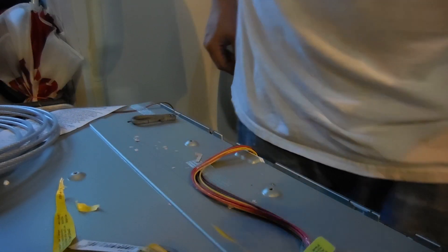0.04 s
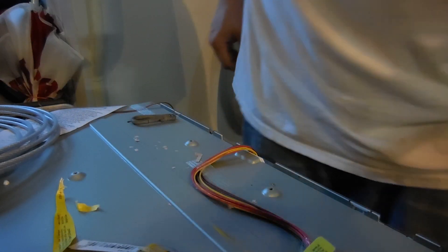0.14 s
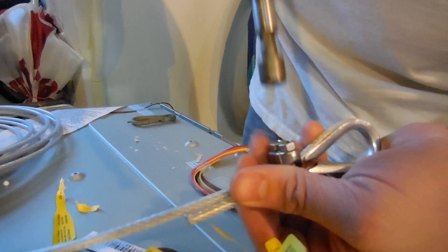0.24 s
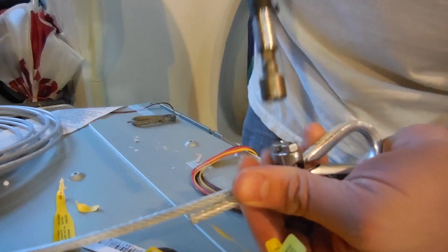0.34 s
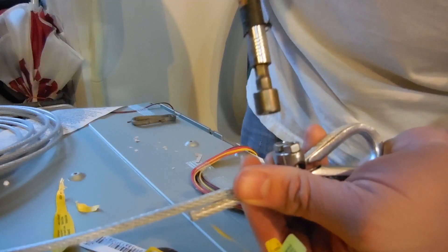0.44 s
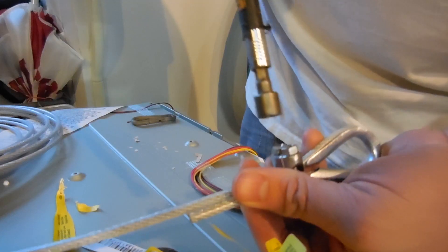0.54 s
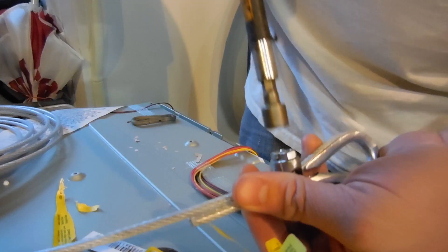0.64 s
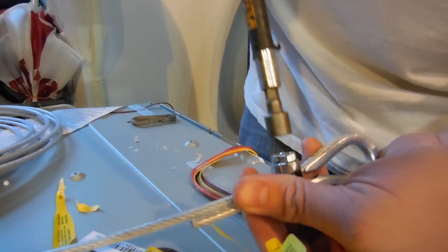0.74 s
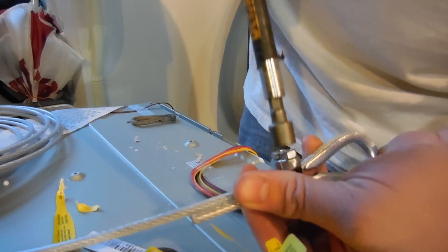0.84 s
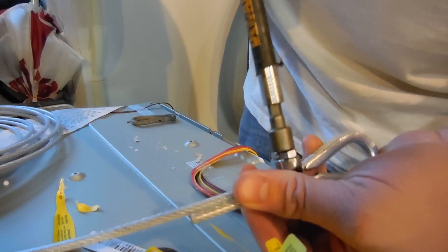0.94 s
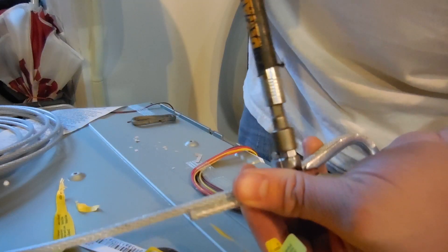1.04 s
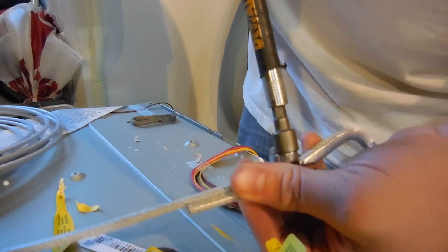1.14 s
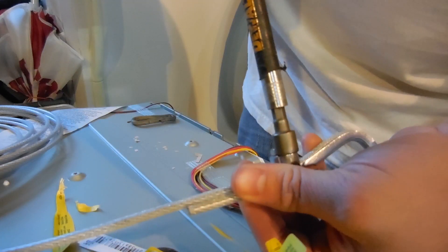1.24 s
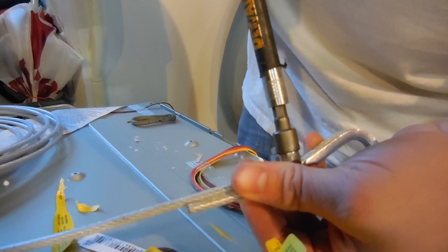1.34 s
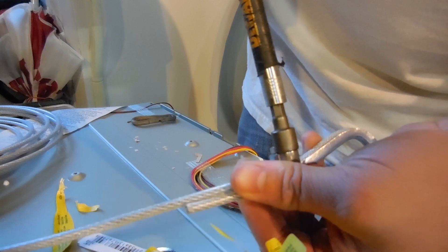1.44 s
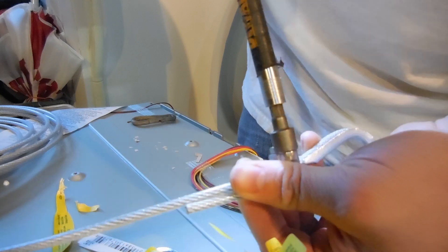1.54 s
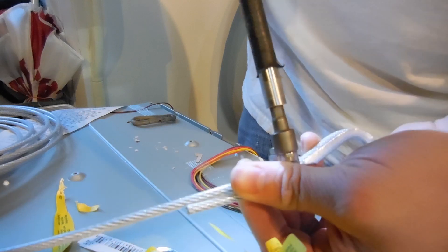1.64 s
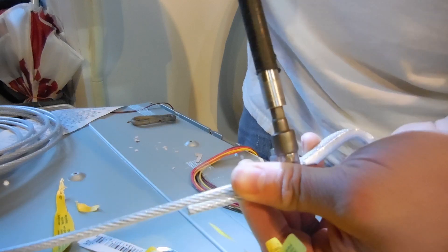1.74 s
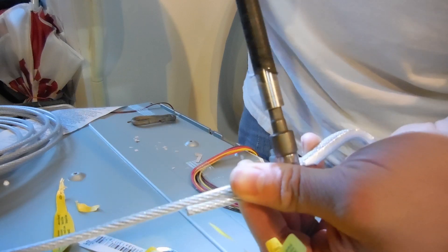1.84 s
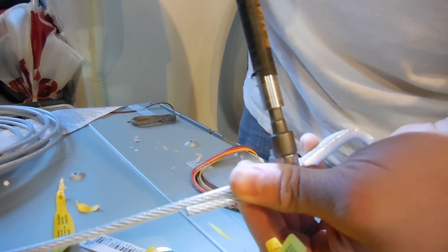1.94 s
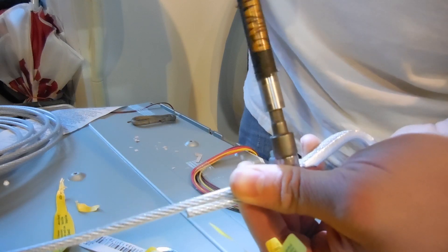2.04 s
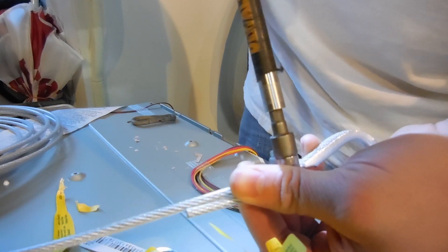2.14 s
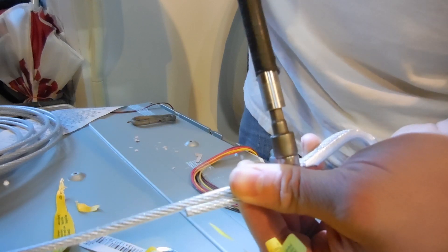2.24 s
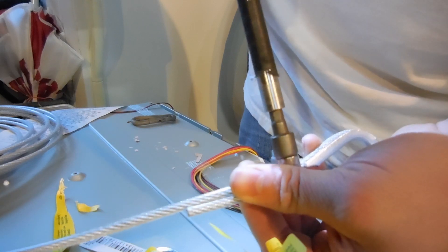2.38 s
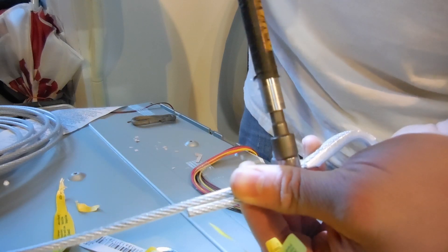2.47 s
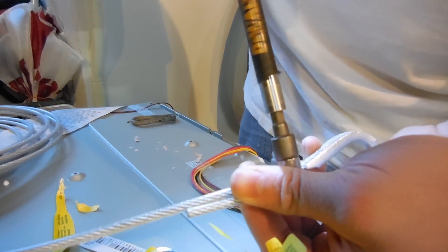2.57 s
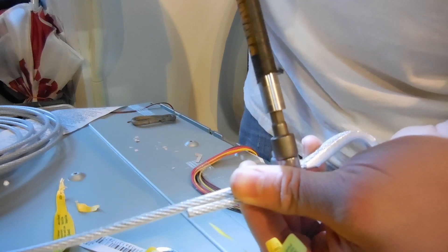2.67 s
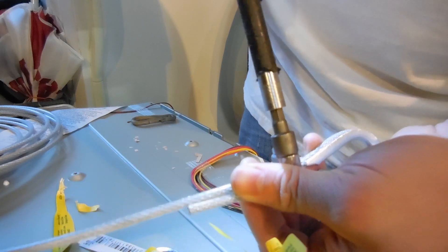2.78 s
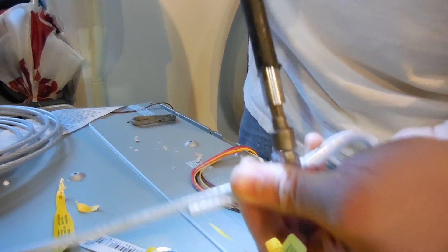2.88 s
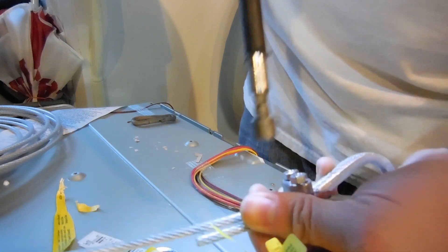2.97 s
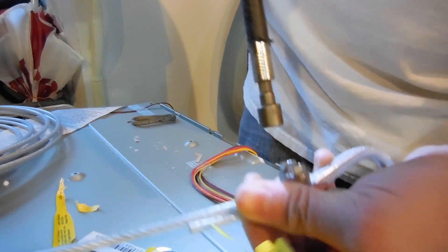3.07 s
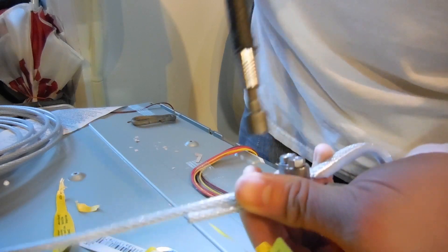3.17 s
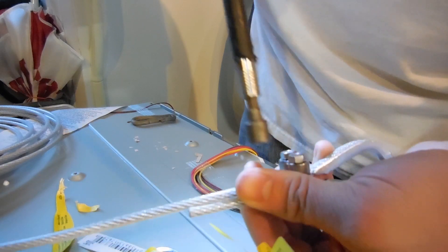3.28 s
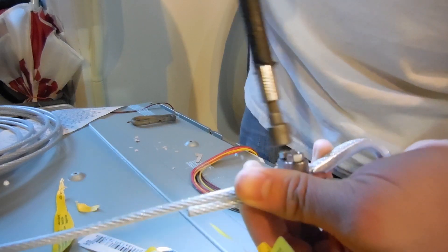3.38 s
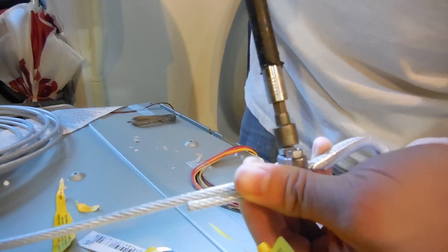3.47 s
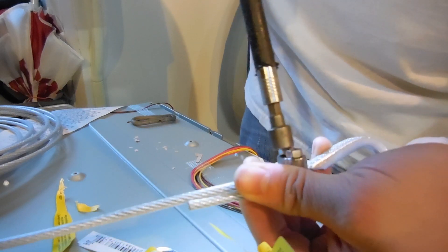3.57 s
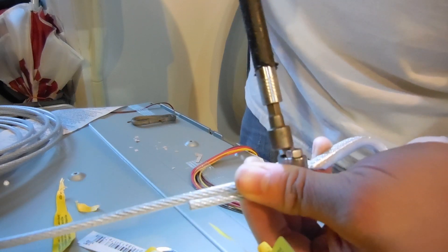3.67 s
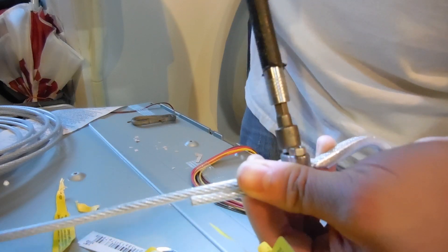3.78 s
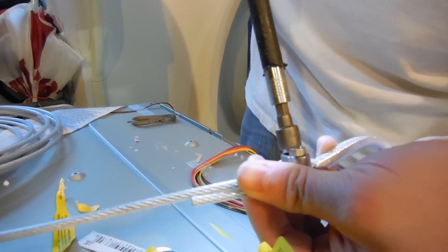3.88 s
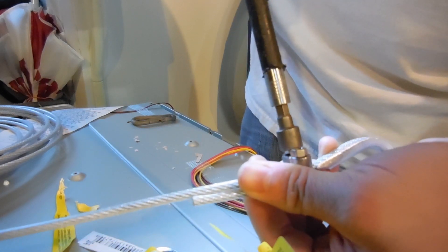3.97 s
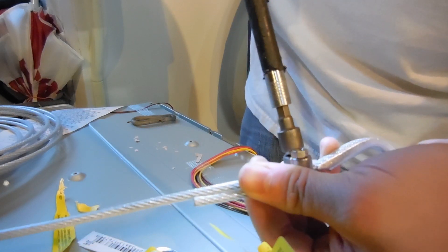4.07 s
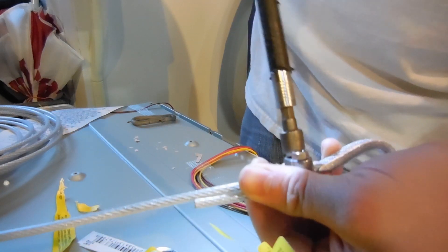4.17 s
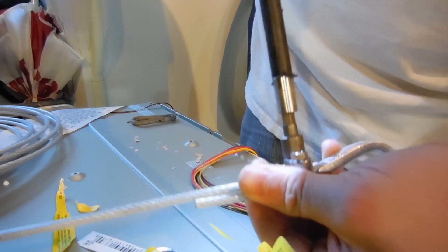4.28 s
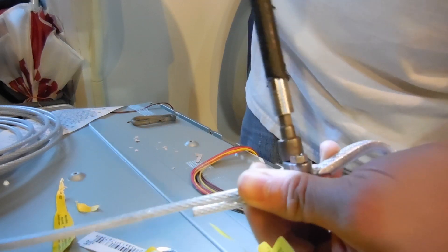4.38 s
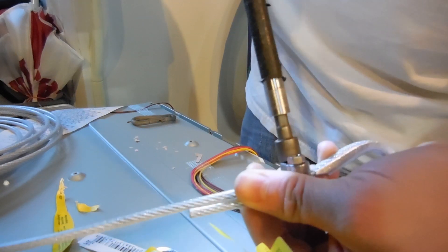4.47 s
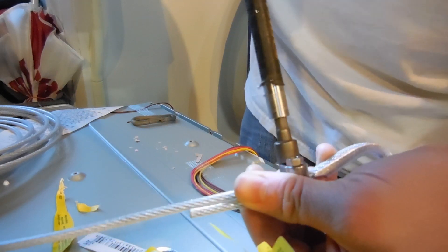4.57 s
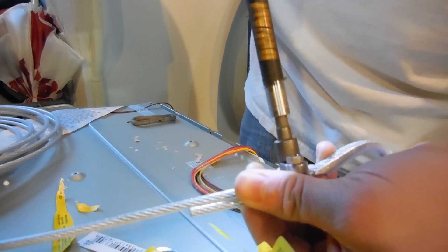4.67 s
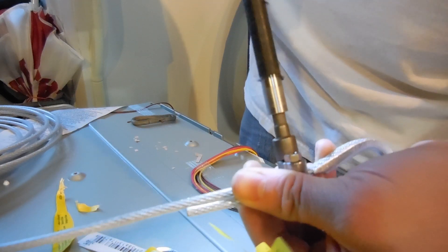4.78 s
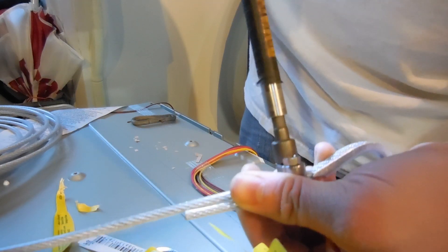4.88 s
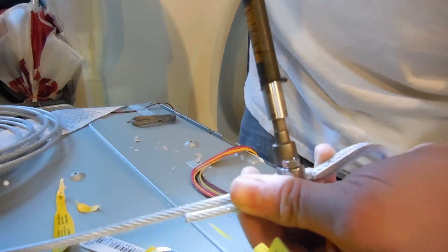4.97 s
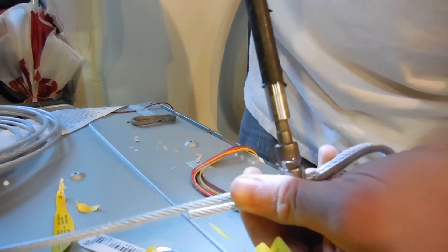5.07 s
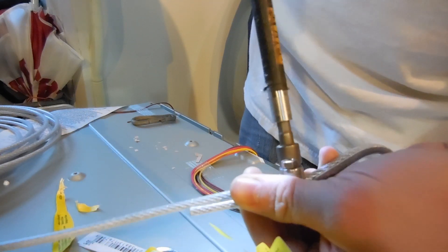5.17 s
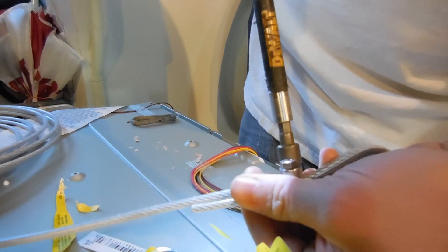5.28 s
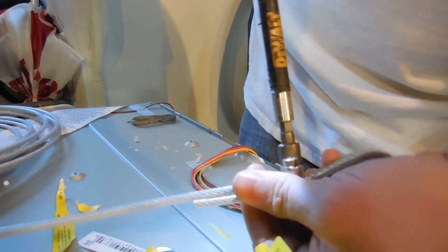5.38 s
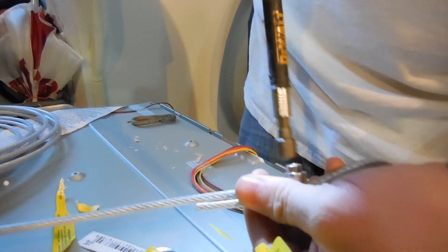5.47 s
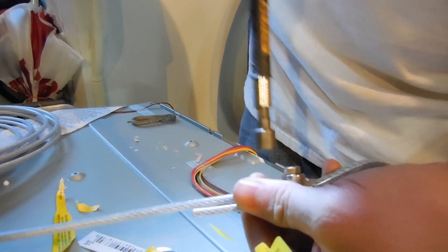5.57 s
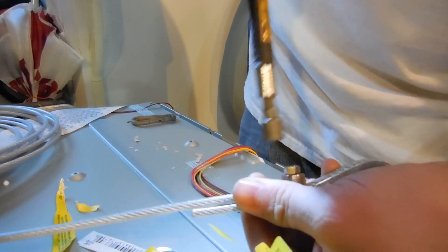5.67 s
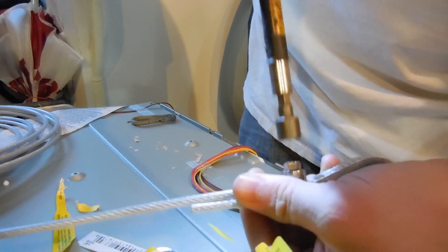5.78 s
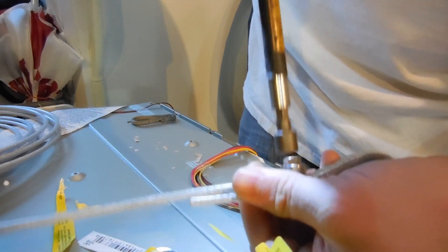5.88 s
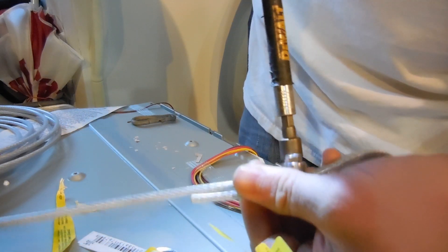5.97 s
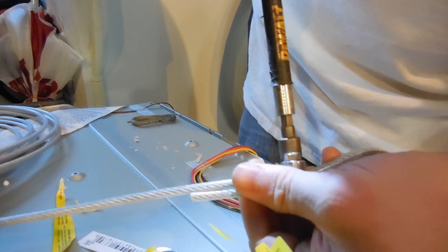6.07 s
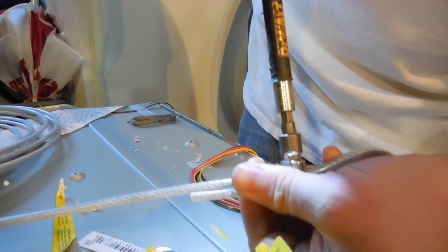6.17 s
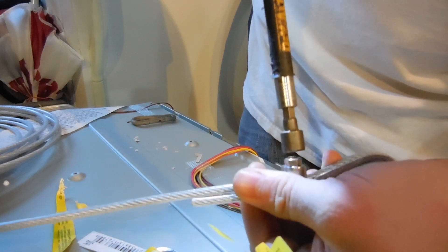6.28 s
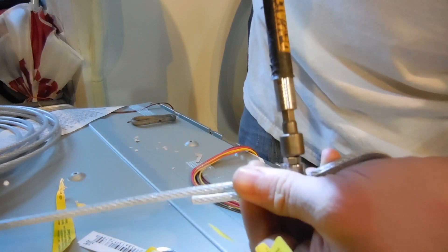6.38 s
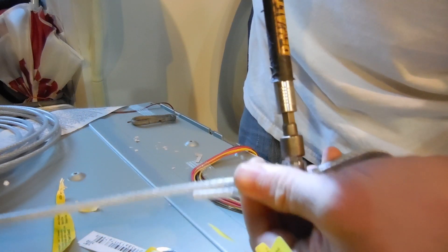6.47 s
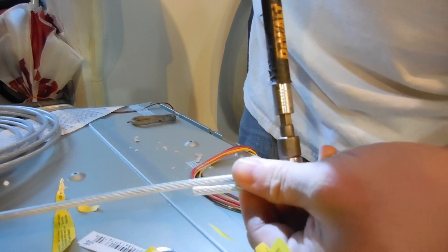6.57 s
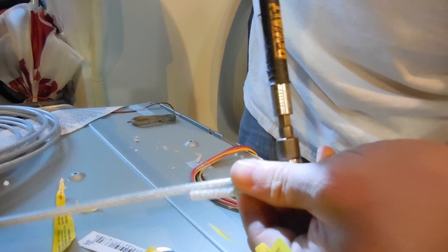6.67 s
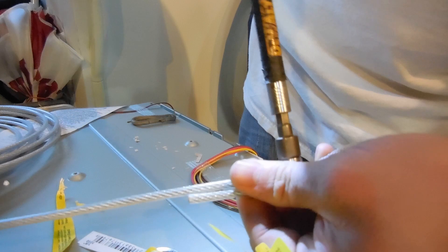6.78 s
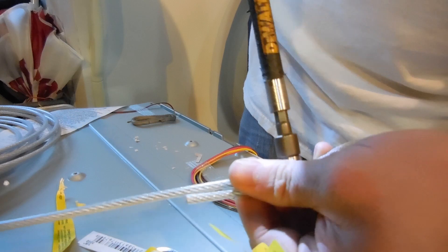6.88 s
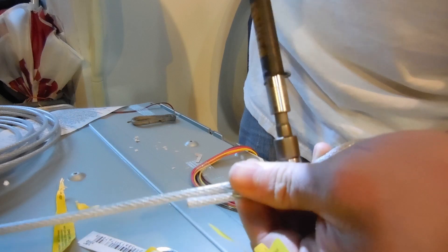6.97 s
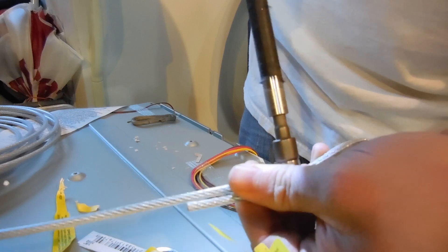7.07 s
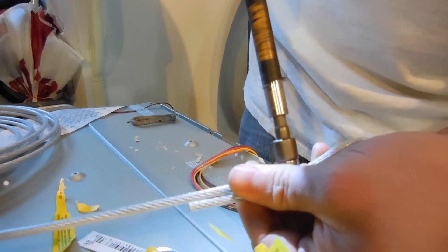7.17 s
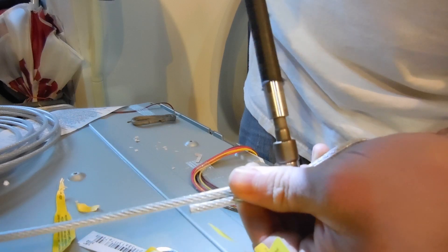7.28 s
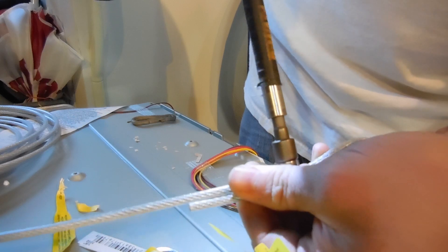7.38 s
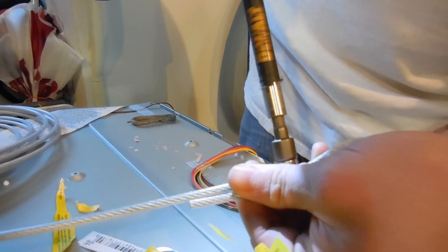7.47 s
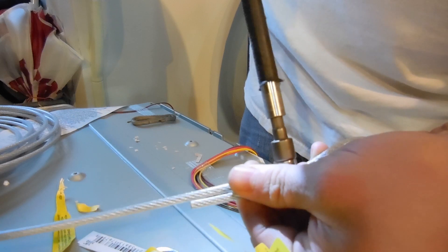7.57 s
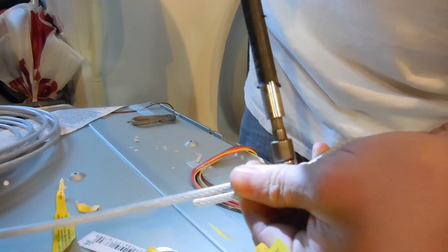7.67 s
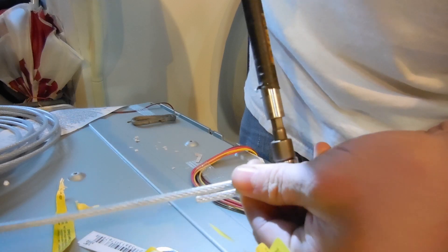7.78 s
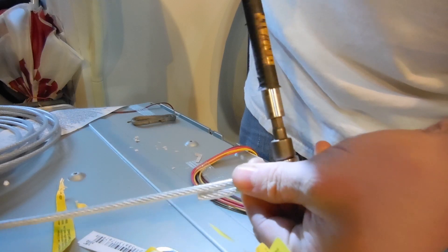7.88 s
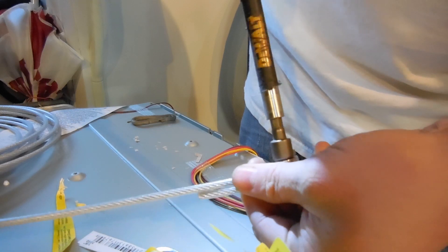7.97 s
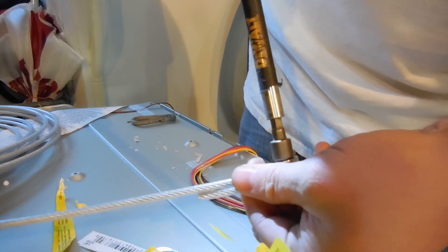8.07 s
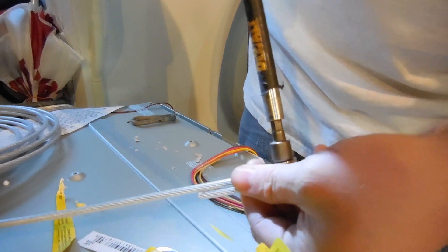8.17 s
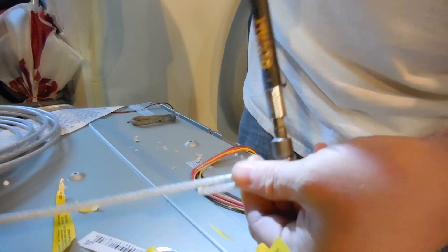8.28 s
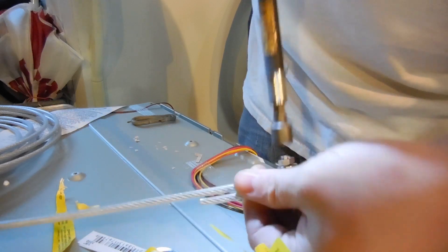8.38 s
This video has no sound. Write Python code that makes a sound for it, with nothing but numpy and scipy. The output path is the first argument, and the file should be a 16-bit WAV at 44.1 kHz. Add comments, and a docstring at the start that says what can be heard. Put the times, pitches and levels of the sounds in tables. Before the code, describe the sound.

Very close in a small, quiet workshop, a steel socket ticks on a nut, then a cordless drill whines slowly under a thin high whistle and stops. More taps and a scrape follow, then a faster, brighter burst. After further metal clicks, a third burst leaps up and steadily slows under load. Plastic trigger snaps mark the pulls. Faint air hiss and a low appliance hum lie beneath, with a very short wall echo.

```python
"""Cordless drill on clamp nuts

Three short bursts of a cordless drill with a socket, close to a phone in a small workshop.
The motor whines as a sum of shaft orders through case resonances, over filtered brush and gear noise.
The speed control whistles as a steady tone with commutator side tones; the trigger clicks as bursts of noise.
The steel socket taps and scrapes on the nuts as noise blows on damped modes. Air hiss and an appliance hum
fill the quiet room, and the near walls answer as a short noise echo."""
import sys
import numpy as np
from scipy import signal
from scipy.fft import rfft, irfft, next_fast_len
from scipy.io import wavfile
from scipy.ndimage import uniform_filter1d

SR = 44100
rng = np.random.default_rng(int(sys.argv[2]) if len(sys.argv) > 2 else 0)


def persist_wave(psi):
    """Save psi, clipped to +-1, as 16-bit WAV."""
    counts = np.round(np.clip(psi, -1, 1) * 32767).astype(np.int16)
    wavfile.write(sys.argv[1], SR, np.atleast_2d(counts).T)


def gain_from_decibels(decibels):
    """Convert decibel values to linear amplitude factors."""
    exponent = np.asarray(decibels, float) / 20
    return 10 ** exponent


N = 371763
T = np.arange(N) / SR
SEGMENTS = 10  # commutator bars passing in a shaft turn
OPPOSITE = np.array([[1], [-1]])  # signs at the two microphone ports

# Trigger pulls. Each row: pulled in seconds, let go in seconds, weak orders in dB over the hiss,
# pinion in dB over the hiss, both ahead of the resonances.
PULLS = [(1.476, 2.803, -33, -9.5), (4.299, 5.281, -28.5, -6), (6.86, 8.16, -30.5, -11.5)]


def unit(x):
    """Scale to rms 1."""
    return x / np.sqrt(np.mean(x ** 2))


def colour(x, points):
    """Filter through (Hz, dB) points."""
    hz, db = np.transpose(points)
    size = next_fast_len(N)
    f = np.maximum(np.fft.rfftfreq(size, 1 / SR), 1)
    gain = gain_from_decibels(np.interp(np.log(f), np.log(hz), db))
    return irfft(rfft(x, size) * gain, size)[..., :N]


def band(x, hz, width):
    """One resonance, gain 1 at its centre."""
    return signal.lfilter(*signal.iirpeak(hz, hz / width, SR), x)


def walk(rate):
    """Slow chance with rms 1, about rate new values a second."""
    hold = int(SR / rate)
    steps = np.repeat(rng.standard_normal(N // hold + 1), hold)
    return unit(uniform_filter1d(steps, hold)[:N])


def unit_ring(x, hz, t60):
    """One damped mode, falling 60 dB in t60 seconds."""
    pole = np.exp(2j * np.pi * hz / SR - np.log(1000) / (t60 * SR))
    return signal.lfilter([1], [1, -pole], x).imag


def ring(blows, modes):
    """Blows set damped modes ringing."""
    return sum(gain_from_decibels(db) * unit_ring(blows, hz, t60) for hz, db, t60 in modes)


def add(track, s, x):
    """Mix x into track at s seconds."""
    i = int(s * SR)
    track[i:i + len(x)] += x[:len(track) - i]


def jumps(steps_db, n):
    """Gain for n samples that jumps every 40 samples by the given values in dB."""
    return gain_from_decibels(steps_db).repeat(40)[:n]


def port_noise(side_share):
    """White noise at two ports, partly shared: a common middle and an opposed side."""
    mid, side = rng.standard_normal((2, N))
    return mid + side_share * side * OPPOSITE


def air_hiss():
    """Faint room air: coloured noise, partly shared by both ports."""
    # Each row: frequency in Hz, level in dB.
    air_points = [(24, -55.5), (40, -33.5), (278, -8), (324, -10), (593, -3), (656, -5), (844, -2),
                  (3050, -5.5), (15300, -17), (16500, -45.5)]
    return gain_from_decibels(-57.5) * unit(colour(port_noise(0.867), air_points))


def appliance_hum():
    """Narrow bands of noise and two unsteady tones, heard from 0.32 s on."""
    # Each row: frequency in Hz, width in Hz, level in dB.
    hum_bands = [(110, 30, -75), (195, 20, -78.5), (214, 24, -79.5), (55, 44, -74), (280.6, 36, -84.5)]
    # Each row: frequency in Hz, level in dB (rms).
    hum_tones = [(94.5, -67.5), (226, -76)]
    start_s = 0.32
    pair = port_noise(0.2)
    hum = sum(gain_from_decibels(db) * unit(band(pair, hz, w)) for hz, w, db in hum_bands)
    for hz, db in hum_tones:
        level = np.sqrt(2) * gain_from_decibels(db + 1.4 * walk(4.5))
        phase = 2 * np.pi * hz * np.cumsum(1 + 0.006 * walk(3.7)) / SR
        hum = hum + level * np.sin(phase)
    return hum * (T > start_s)


def trigger():
    """Short dull snaps of the plastic switch: fast dying noise through a low and a treble resonance."""
    # Each row: start in seconds, peak of the low part in dB, its centre in Hz, treble in dB against it.
    snaps = [(1.376, -21, 1485, -35.5), (1.419, -25.5, 2694, -3), (1.514, -39.5, 5560, -13),
             (2.928, -19, 4980, -20), (4.24, -25.5, 2790, 0), (6.807, -19, 2800, -11.5),
             (6.851, -27.5, 4134, -16), (8.241, -35.5, 5000, -22.5), (8.367, -12, 4200, -12)]
    out = np.zeros(N)
    t = np.arange(SR // 30) / SR
    for s, db, hz, treble_db in snaps:
        fade = np.exp(-t / 0.00022) + 0.024 * np.exp(-t / 0.0021)
        snap = rng.standard_normal(len(t)) * fade
        low, high = band(snap, hz, 0.33 * hz), band(snap, 8500, 8000)
        add(out, s, gain_from_decibels(db) * (low / abs(low).max() + gain_from_decibels(treble_db) * high / abs(high).max()))
    return out


def socket():
    """Steel taps and scrapes on the nuts: a crack, a low knock and two families of damped modes."""
    # Socket striking steel. Each row: start in seconds, level in dB, then body ring, thin ring and
    # low knock in dB, all ahead of the mix gains.
    taps = [(0.9932, -36.5, -13.5, -6.5, -11), (1.005, -48, -43, -1.5, -6.5),
            (1.1336, -35, -16, -12.5, -5.5), (1.1468, -42.5, -16.5, -9.5, -29),
            (1.175, -32.5, -25, -4.5, -15), (1.1901, -14.5, -26, -15, -30), (1.2815, -38, -25.5, -11, -29),
            (3.5233, -28.5, -24.5, -14, -13), (3.5723, -24.5, -20.5, -9.5, -24), (3.598, -48, -28, 8.5, 1),
            (3.611, -59, -30, 12.5, -13.5), (3.7882, -32.5, -14.5, -24, -3.5),
            (3.8063, -28.5, -28.5, 1.5, -24), (3.8155, -26, -24.5, -20.5, -3.5),
            (3.8394, -25.5, -27, -35, -11), (3.862, -57, -30, 5.5, -14), (4.2773, -12, -30, -12.5, -13.5),
            (5.473, -37, -27, -10.5, 2.5), (5.9407, -30, -15, -2.5, 1), (5.947, -42, -22, -3, -5),
            (6.034, -25.5, -15.5, -46, -7), (6.046, -36, -21.5, -16.5, -5.5),
            (6.2524, -25, -29.5, -8, -48.5), (6.4123, -23, -30, -11, -16),
            (6.4766, -17.5, -29.5, -15, -18.5), (6.5579, -9.5, -27, -30.5, -29.5)]
    # Socket sliding over a nut. Each row: start in seconds, length in seconds, level in dB,
    # thin ring in dB, grittiness in dB, levels ahead of the mix gains.
    scrapes = [(1.1, 0.035, -56.5, -12, 6), (3.774, 0.044, -43.5, 2, 4.5), (3.839, .03, -46.5, 3, -0.5),
               (5.539, .07, -51.5, -12.5, 3), (5.981, 0.032, -44, 5, 1.5), (6.51, 0.021, -49.5, 2, 1.5),
               (8.385, 0.012, -37, 1.5, 1.5)]
    # Modes of the socket body. Each row: frequency in Hz, level in dB, 60 dB decay in seconds.
    body_modes = [(3510, -11, .05), (4200, -2, 0.12), (4720, 5, 0.075), (5970, -8, 0.03)]
    # Thin ringing modes. Each row: frequency in Hz, level in dB, 60 dB decay in seconds.
    thin_modes = [(11720, -1.5, 0.016), (12281, 0, .013), (12650, -4, .012), (13060, -6, .012),
                  (3530, -8, 0.02)]
    crack, body, thin, knock = np.zeros((4, N))
    t = np.arange(SR // 25) / SR
    for s, db, body_db, thin_db, knock_db in taps:
        blow = gain_from_decibels(db) * rng.standard_normal(len(t))
        add(crack, s, blow * (np.exp(-t / 0.0004) + 0.027 * np.exp(-t / 0.0037)))
        add(knock, s, gain_from_decibels(knock_db) * blow * np.exp(-t / 0.0043))
        add(body, s, gain_from_decibels(db + body_db) * (t == 0))
        # loose play makes the thin modes chatter for a moment
        chatter = jumps(1.9 * rng.standard_normal(len(t) // 40 + 1), len(t))
        add(thin, s, gain_from_decibels(thin_db) * blow * np.exp(-t / 0.0024) * chatter)
    for s, length, db, thin_db, grit_db in scrapes:
        n = int(length * SR)
        catches = jumps(grit_db * rng.exponential(size=n // 40 + 1), n)
        grit = gain_from_decibels(db) * np.hanning(n) * rng.standard_normal(n) * catches
        add(crack, s, 0.54 * grit)
        add(thin, s, 0.11 * gain_from_decibels(thin_db) * grit)
        add(body, s, 0.0036 * grit)
    blows = gain_from_decibels(5) * band(crack, 4700, 5000) + gain_from_decibels(5) * band(knock, 2330, 3300)
    return blows + gain_from_decibels(2.5) * ring(body, body_modes) + gain_from_decibels(6) * ring(0.14 * thin, thin_modes)


def whistle(bars):
    """Speed control chopping the current: a tone and its octave, wobbled by the commutator phase."""
    # Part trigger. Each row: on in seconds, off in seconds, first level in dB, swell at mid way in dB.
    chops = [(1.477, 2.78, -42.5, 11), (4.277, 4.52, -48, 4.5), (6.847, 6.925, -43, 6)]
    whistle_hz, fade_db_per_s = 7886, 904
    gain = 0
    for on, off, db, swell_db in chops:
        swell = swell_db * np.sin(np.pi * np.clip((T - on) / (off - on), 0, 1))
        fade = fade_db_per_s * np.maximum(T - off, 0)
        gain = gain + (T > on) * gain_from_decibels(db + swell - fade)
    chop = 2 * np.pi * whistle_hz * T
    # the commutator gives the tone its side tones
    tone = np.sin(chop) * (1 + 0.29 * np.sin(bars)) + gain_from_decibels(-24.5) * np.sin(2 * chop)
    return np.sqrt(2) * gain * gain_from_decibels(1.1 * walk(40)) * tone


def turning(pull, go):
    """Samples from a trigger pull until the rotor is taken as still."""
    return (T > pull) & (T < go + 0.25)


def motor_speed():
    """Rotor speeding up from rest, then braked: bar rate in Hz, shaft angle in rad, load in dB, on or off."""
    # Speed under current, one table a pull. Each row: time in seconds, commutator rate in Hz ahead of
    # rounding and braking, load in dB added to the whole motor.
    speeds = [
        [(1.55, 271, -5), (1.63, 521, 2), (1.692, 791, 1), (1.752, 903, -1.5), (1.88, 1055, 0),
         (2.056, 1152, -2), (2.27, 1229, -1.5), (2.606, 1230, -1.5), (2.728, 1099, -1.5), (2.8, 956, -1)],
        [(4.42, 340, 5.5), (4.49, 413, 1), (4.525, 539.7, 3.5), (4.56, 1112, -0.5), (4.63, 1963, -0.5),
         (4.7, 2388, -1), (4.778, 2441, -2), (5.042, 1978, -0.5), (5.212, 1687, 1.5), (5.29, 1460, 2.5)],
        [(6.9, 417, 0), (6.96, 1283, 1), (7.024, 2039, 1), (7.08, 2500, -1), (7.152, 2594, -2.5),
         (7.416, 1986, 1), (7.722, 1341, 2.5), (7.904, 946, 5.5), (8.09, 562, 5), (8.13, 528, 1)],
    ]
    breakaway_hz = 110.98  # commutator rate as the rotor first moves
    brake_s, coast_s, coast_share = 0.033, 0.14, 0.17  # quick brake, then a slow last turn
    bars_hz, turn, load_db, on = np.zeros((4, N))
    for (pull, go, *_), speed in zip(PULLS, speeds):
        now = turning(pull, go)
        s, hz, db = np.transpose([(pull, breakaway_hz, 0), *speed])
        late = np.maximum(T[now] - go, 0)
        brake = (1 - coast_share) * np.exp(-late / brake_s) + coast_share * np.exp(-late / coast_s)
        # rotor inertia rounds every change
        driven_hz = uniform_filter1d(np.interp(T[now], s, hz), SR // 25, mode="nearest")
        bars_hz[now] = driven_hz * brake
        turn[now] = 2 * np.pi * np.cumsum(bars_hz[now] / SEGMENTS) / SR
        load_db[now] = np.interp(T[now], s, db)
        on[now] = 1
    return bars_hz, turn, load_db, on


def motor_whine(bars_hz, turn):
    """Sines on multiples of the shaft angle, gliding through the case modes, and the pinion mesh."""
    # Strong shaft orders; tens are the commutator. Each row: multiple of shaft rate, then level in dB
    # over the hiss in bursts 1, 2 and 3, ahead of the case modes.
    orders = [(2, -22, -10, -11), (10, -7, -6, -7), (19, -33.5, -31.5, -38.5), (20, -12, -8, -12),
              (30, -13, -10, -10), (40, -13, -14.5, -14.5), (50, -9.5, -16, -16), (60, -18, -13, -16),
              (70, -21, -17, -23), (80, -14, -30, -19), (90, -22.5, -29.5, -22), (100, -28.5, -38, -38)]
    # Case modes. Each row: frequency in Hz, width of one filter pass in Hz, level in dB.
    case_modes = [(528, 130, -10.5), (1234, 470, -0.5), (1844, 340, -2.5), (2196, 308, 13), (2996, 680, 6),
                  (3820, 560, 10.5), (4760, 620, 11), (5663, 570, 11.5), (6260, 700, 15.5),
                  (7300, 1700, 11), (8800, 1400, 14), (9950, 1600, 10.5), (12400, 3200, 12.5)]
    # weak orders are the other multiples, from an uneven rotor
    top_order, weak_rise_db, weak_spread_db, dip_size_db = 120, 8, 2.5, 6
    pinion_teeth = 15
    chance = rng.standard_normal((top_order + 1, 2))
    slow_chance = walk(11)
    # quick unevenness of the shaft angle, in rad; it roughens high orders most
    wobble = 0.0066 * walk(150)
    whine, mesh = np.zeros((2, N))
    for burst, (pull, go, weak_db, pinion_db) in enumerate(PULLS, 1):
        now = turning(pull, go)
        shaft_hz = bars_hz[now] / SEGMENTS
        top_hz = shaft_hz.max()
        strong = {round(row[0]): row[burst] for row in orders}
        # high orders stand out of the hiss only near the top speed of the pull
        clear = np.clip(shaft_hz / (0.7 * top_hz), 0, 1)
        # the tones die with the current
        live = np.exp(-np.maximum(T[now] - go, 0) / 0.035)
        angle = turn[now] + wobble[now]
        for k in range(1, top_order + 1):
            weak = weak_db + weak_rise_db * k / top_order + weak_spread_db * chance[k, 0]
            # each order dips in level by slow chance, high orders deepest
            dip = abs(np.roll(slow_chance, k * N // top_order)[now])
            dip_db = dip_size_db * min(k * top_hz / 6000, 1) * dip
            level = gain_from_decibels(strong.get(k, weak) - dip_db) * live
            level = level * clear ** np.clip(k / SEGMENTS / 2 - 1, 0, 2)
            below_limit = k * shaft_hz < 0.45 * SR
            whine[now] += level * np.sin(k * angle + np.pi * chance[k, 1]) * below_limit
        mesh[now] = gain_from_decibels(pinion_db) * live * np.sqrt(clear) * np.sin(pinion_teeth * angle)
    # steep modes, neighbours in opposite sense, so the valleys between them are deep
    lowest, *upper = [(-1) ** k * gain_from_decibels(db) * band(band(whine, hz, w), hz, w)
                      for k, (hz, w, db) in enumerate(case_modes)]
    # the upper case modes radiate little under 960 Hz
    edges = signal.butter(4, [960, 14500], "band", fs=SR, output="sos")
    return lowest + signal.sosfilt(edges, sum(upper)) + band(mesh, 3000, 2500)


def motor():
    """Whine with brush hiss through the housing, gearbox growl and rumble, all following the speed."""
    # Housing. Each row: frequency in Hz, level in dB.
    housing = [(410, -40.5), (700, -77), (1020, -12.5), (1200, -4.5), (1580, -3), (2220, -12), (2560, -6.5),
               (3790, 2), (4380, 0.5), (4730, 0.5), (5120, 5), (5920, 8), (6480, 3), (12600, -5),
               (15000, -13.5), (16500, -63.5)]
    # Gearbox resonances. Each row: frequency in Hz, width in Hz, level in dB.
    gearbox = [(1424, 130, -0.5), (2340, 1400, 1.5)]
    # Grip and bench. Each row: frequency in Hz, level in dB.
    grip = [(25, -34), (60, -20.5), (130, -10.5), (210, 2), (300, 1), (420, 4.5), (550, 4), (900, 4.5),
            (1500, -33)]
    # How the noise follows speed. Each row: commutator rate in Hz, hiss in dB ahead of the load,
    # gear growl in dB over the hiss, rumble in dB over the hiss.
    noise_law = np.array([(30, -81.5, 6.5, -20), (195, -50, 0, -30), (537, -30.5, -4.5, -78),
                          (1060, -22, -15.5, -41), (1350, -18.5, -10, -26.5), (1650, -19.5, -10, -23),
                          (2620, -13.5, -7.5, -21)])
    bars_hz, turn, load_db, on = motor_speed()
    log_rate, log_knots = np.log(bars_hz + 1), np.log(noise_law[:, 0])
    hiss_db, growl_db, rumble_db = (np.interp(log_rate, log_knots, db) for db in noise_law[:, 1:].T)
    # brushes and gears rub harder once a turn
    rub = (1 + 0.11 * np.sin(turn)) * gain_from_decibels(0.9 * walk(60))
    # three noises, each in two directions: to the microphone and to the walls
    brush_noise, gear_noise, bench_noise = rng.standard_normal((3, 2, N)) * rub
    hiss = unit(colour(brush_noise, housing))
    growl = unit(sum(gain_from_decibels(db) * band(gear_noise, hz, w) for hz, w, db in gearbox))
    rumble = unit(colour(bench_noise, grip))
    parts = hiss + motor_whine(bars_hz, turn) + gain_from_decibels(growl_db) * growl + gain_from_decibels(rumble_db) * rumble
    return gain_from_decibels(hiss_db + load_db) * parts * on, SEGMENTS * turn


def near_walls(sound):
    """Echo off the near walls as decaying noise: one part shared by both ports, one that differs."""
    # Differing echo. Each row: frequency in Hz, level in dB.
    apart_points = [(60, -2.5), (110, -6), (200, 2), (380, -5), (700, -5), (1290, -9.5), (2380, -9),
                    (4400, -4.5), (8120, -6), (15000, 0)]
    t60_s, shared_db = 0.054, -8
    t = np.arange(SR // 5) / SR
    walls = rng.standard_normal((2, len(t))) * np.exp(-np.log(1000) * t / t60_s)
    walls /= np.sqrt(np.sum(walls ** 2, axis=1, keepdims=True))
    shared, apart = signal.fftconvolve(sound[None], walls, axes=1)[:, :N]
    return gain_from_decibels(shared_db) * band(shared, 3300, 3700), colour(apart, apart_points) * OPPOSITE


def scene():
    """Everything at the bench, heard direct and off the near walls at two ports."""
    drill, bars = motor()
    clicks = socket() + trigger()
    # the walls hear the drill from other sides, with the hiss of other vents
    near, round_about = drill + whistle(bars) + clicks
    shared, apart = near_walls(round_about)
    port_gain = gain_from_decibels(np.array([[-0.4], [0.4]]))
    return port_gain * (near + shared) + apart + air_hiss() + appliance_hum()


def top_cut(x):
    """Nothing passes above the cut-off."""
    return signal.sosfilt(signal.butter(12, 16800, fs=SR, output="sos"), x)


def record(dry):
    """The phone drops the deepest bass and rounds the loudest peaks."""
    bass_cut = signal.butter(2, 55, "high", fs=SR, output="sos")
    mix = np.tanh(0.8 * signal.sosfilt(bass_cut, dry)) / 0.87
    return top_cut(mix)


dry = scene()
out = record(dry)
persist_wave(out)
```